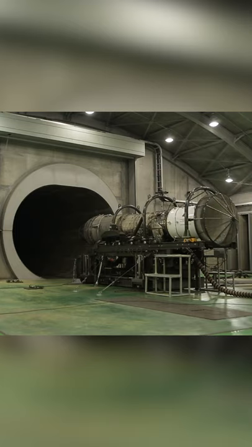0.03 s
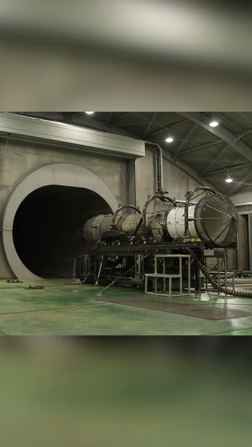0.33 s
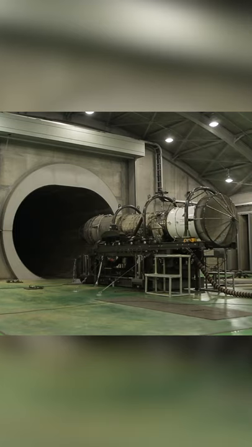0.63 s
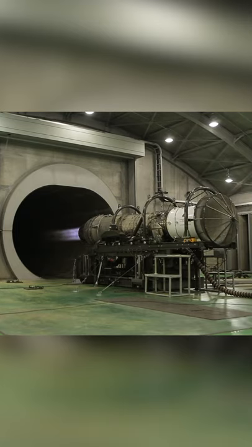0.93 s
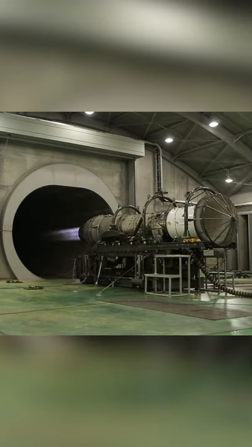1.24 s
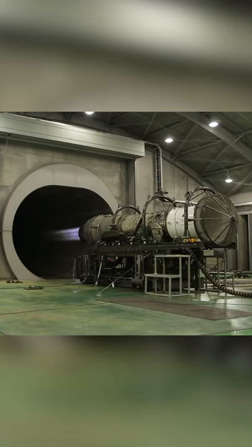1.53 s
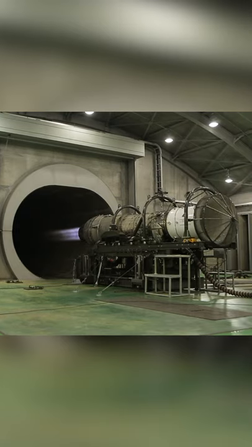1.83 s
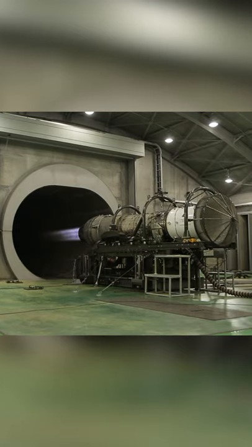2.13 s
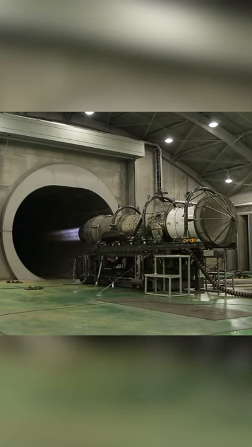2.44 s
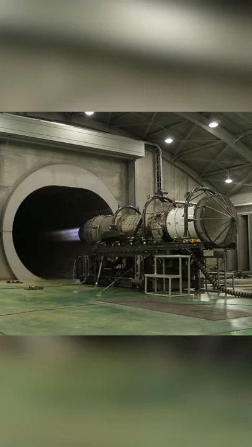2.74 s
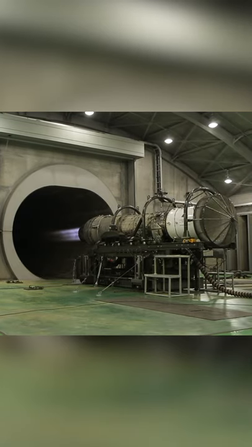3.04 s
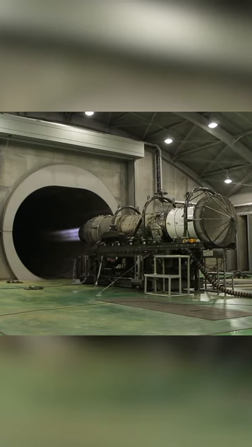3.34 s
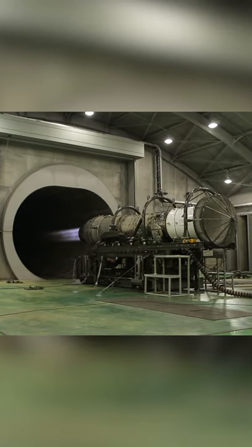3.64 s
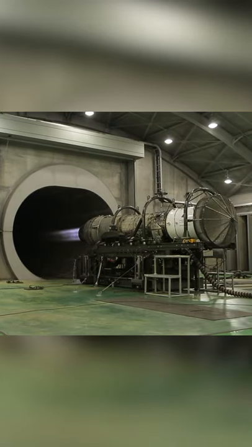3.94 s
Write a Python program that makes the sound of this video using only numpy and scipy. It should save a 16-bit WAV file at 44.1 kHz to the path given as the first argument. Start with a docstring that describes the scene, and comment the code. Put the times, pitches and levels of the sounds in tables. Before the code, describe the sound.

Jet engine roaring steadily at full power in an enclosed test cell, harshly distorted.

```python
"""A jet engine at full power in an enclosed test cell: a steady roar of turbulent exhaust, coloured by
the cell's broad resonances, with two faint turbine whines behind it. It overloads the microphone so
heavily that the wave is squared off into a dense, harsh rasp. The sound cuts in abruptly, dulls for an
instant early on and steps up a little near the end."""
import sys
import numpy as np
from scipy import signal
from scipy.fft import rfft, irfft
from scipy.io import wavfile
from scipy.ndimage import uniform_filter1d

SR = 44100
rng = np.random.default_rng(int(sys.argv[2]) if len(sys.argv) > 2 else 0)


def master_out(mix):
    """Clip the mix to full scale and print it as 16-bit PCM to the path in sys.argv[1]."""
    frames = np.transpose(np.atleast_2d(mix))
    ceiling = np.clip(frames, -1, 1)
    pcm = np.round(ceiling * 32767).astype(np.int16)
    wavfile.write(sys.argv[1], SR, pcm)


N = 176400


def undb(db):
    """Decibels to gain."""
    return 10 ** (np.asarray(db) / 20)


def noise(gain):
    """Noise of rms 1 with the given gain at each frequency."""
    x = irfft(rfft(rng.standard_normal(N)) * gain, N)
    return x / np.std(x)


def drift(rate):
    """Slow random modulation: levels held 1 / rate s and smoothed twice; spread near 1."""
    hold = int(SR / rate)
    steps = np.repeat(rng.standard_normal(N // hold + 1), hold)
    return 1.3 * uniform_filter1d(uniform_filter1d(steps, hold), hold)[:N]


def lowpass(x, hz):
    """The part of a sound under a frequency."""
    return signal.sosfiltfilt(signal.butter(2, hz, fs=SR, output="sos"), x)


def bell(f, centre, width):
    """A resonance curve peaking at 1, with its width taken at half height."""
    return 1 / (1 + (2 * (f - centre) / width) ** 2)


# Blade whines, levels against the roar: (frequency [Hz], width [Hz], level [dB])
BLADE_WHINES = [(4905, 22, -29), (7130, 45, -29.5)]


def turbine(f):
    """Blade tones, blurred into narrow bands by the flow and the echoing cell."""
    return sum(undb(db) * noise(bell(f, hz, width)) for hz, width, db in BLADE_WHINES)


# Resonances of the test cell: (frequency [Hz], width [Hz], boost [dB])
CELL_RESONANCES = [(245, 40, 1.5), (362, 65, 3.5), (535, 30, 0.5), (910, 40, 0.5), (1217, 50, 2)]


def cell_boost_db(f):
    """The enclosed cell resonates, adding gentle bumps to the roar's spectrum."""
    return sum(db * bell(f, hz, width) for hz, width, db in CELL_RESONANCES)


# Tone curve of the exhaust turbulence: (frequency [Hz], relative level [dB])
EXHAUST_SPECTRUM = [(25, -14), (45, -7), (80, -6.5), (150, -4.5), (300, -3), (620, -2), (850, -0.16),
                    (1250, 0), (1700, 0.26), (2130, -1), (2450, -4.5), (3200, -5.5), (4500, -9.5),
                    (6000, -13.5), (8000, -15.5), (11000, -23), (16000, -45)]


def exhaust(f):
    """Jet turbulence coloured by the cell; rumble, roar and hiss each swell and sink at random."""
    rumble_edge_hz, hiss_edge_hz = 600, 2800
    surge_db, surges_per_s = 0.65, 9
    hz, db = np.array(EXHAUST_SPECTRUM).T
    colour_db = np.interp(np.log(f), np.log(hz), db) + cell_boost_db(f)
    turbulence = noise(undb(colour_db))
    rumble, body = lowpass(turbulence, rumble_edge_hz), lowpass(turbulence, hiss_edge_hz)
    roar, hiss = body - rumble, turbulence - body
    return sum(band * undb(surge_db * drift(surges_per_s)) for band in (rumble, roar, hiss))


def scene():
    """Exhaust and turbine at one microphone, the same in both ears."""
    f = np.maximum(np.fft.rfftfreq(N, 1 / SR), 1)
    return np.tile(exhaust(f) + turbine(f), (2, 1))


def overload(x):
    """The input clips hard; a low cut then tilts the flat tops and the treble is rounded."""
    drive_db, low_cut_hz, treble_hz = 14, 100, 14000
    oversampled = signal.resample_poly(x, 2, 1, axis=-1)
    squared_off = np.clip(oversampled * undb(drive_db), -1, 1)
    rasp = signal.resample_poly(squared_off, 1, 2, axis=-1)
    s = 1j * np.fft.rfftfreq(N, 1 / SR)
    return irfft(rfft(rasp) * (s / (s + low_cut_hz)) ** 2 / (1 + s / treble_hz), N)


def treble_dip(x, t, at_s=.742, width_s=.017, depth_db=-5, above_hz=4500):
    """The top end dulls for an instant."""
    lows = lowpass(x, above_hz)
    return lows + (x - lows) * undb(depth_db * np.exp(-((t - at_s) / width_s) ** 2))


def level_step_db(t, at_s=3.692, rise_db=.8, overshoot_db=1.5, settle_s=.014):
    """The level jumps, overshoots and settles slightly louder."""
    return (t > at_s) * (rise_db + overshoot_db * np.exp(-np.abs(t - at_s) / settle_s))


def record(dry):
    """Overload, a brief treble dip, a hard entrance, a late step in level and a steep top cut."""
    start_s, fade_s = .069, .001
    trim_db, top_cut_hz = -12, 15800
    t = np.arange(N) / SR
    rasp = treble_dip(overload(dry), t)
    entrance = np.clip((t - start_s) / fade_s, 0, 1)
    rasp = rasp * undb(trim_db + level_step_db(t)) * entrance
    top_cut = signal.firwin(601, top_cut_hz, fs=SR, window="blackman")
    return signal.fftconvolve(rasp, top_cut[None], mode="same", axes=-1)


dry = scene()
out = record(dry)
master_out(out)
```